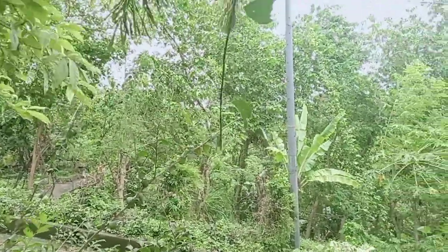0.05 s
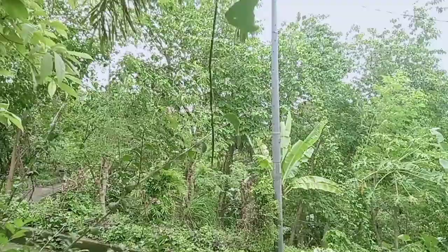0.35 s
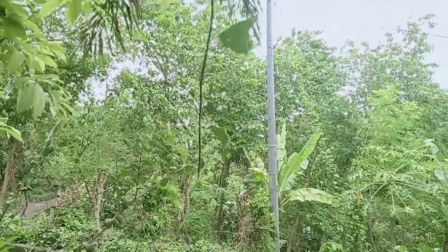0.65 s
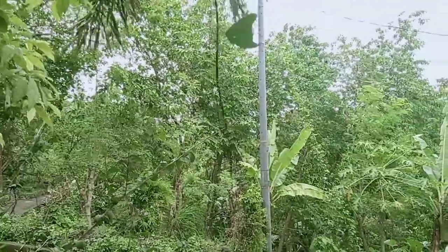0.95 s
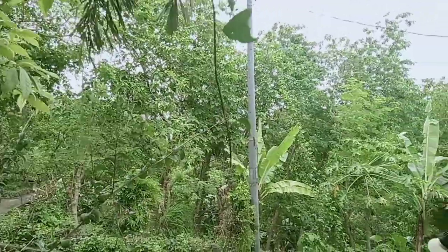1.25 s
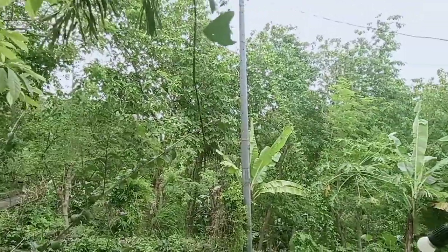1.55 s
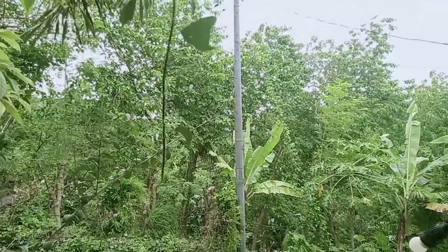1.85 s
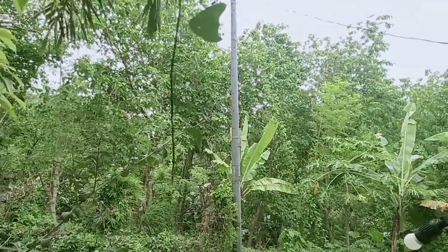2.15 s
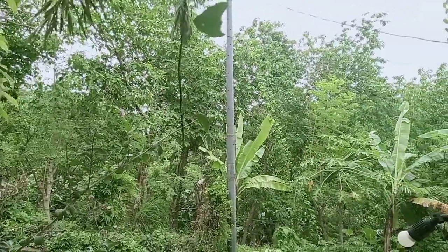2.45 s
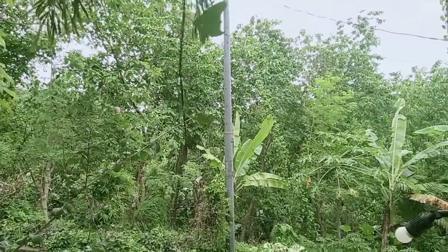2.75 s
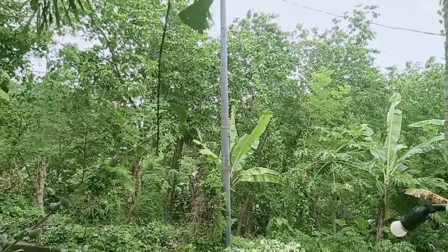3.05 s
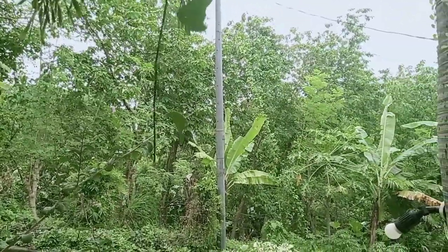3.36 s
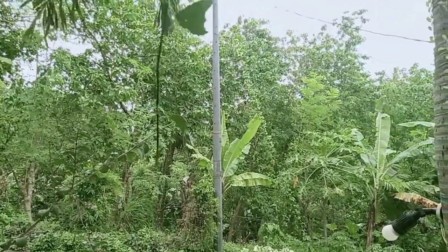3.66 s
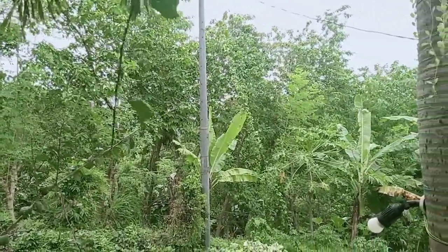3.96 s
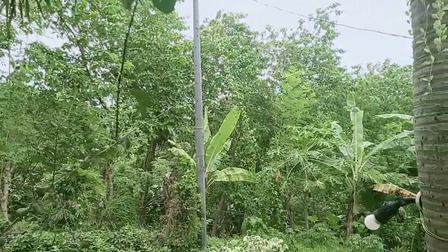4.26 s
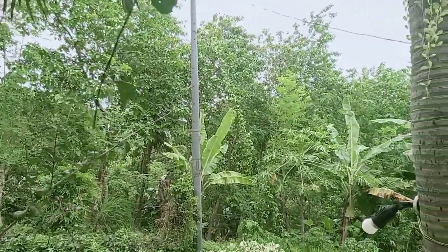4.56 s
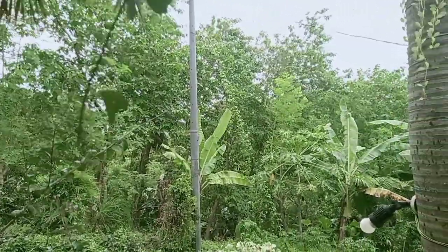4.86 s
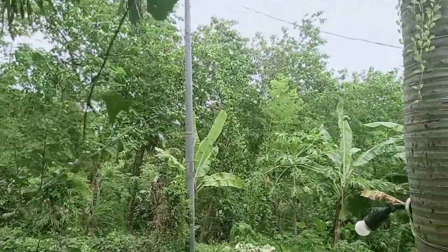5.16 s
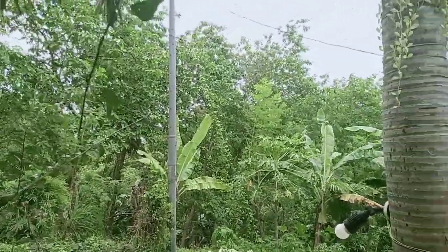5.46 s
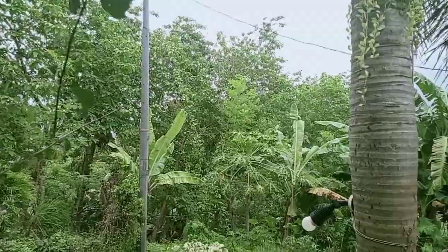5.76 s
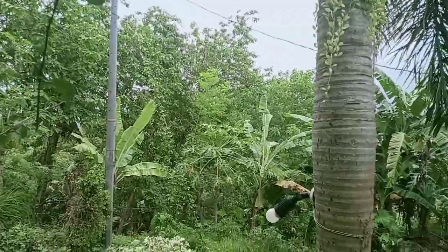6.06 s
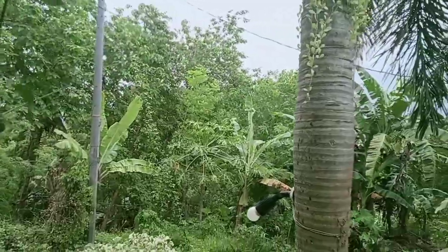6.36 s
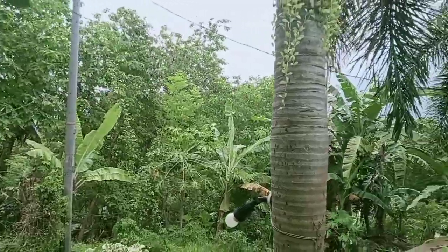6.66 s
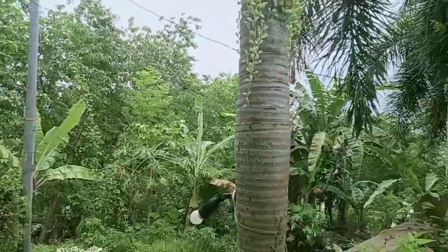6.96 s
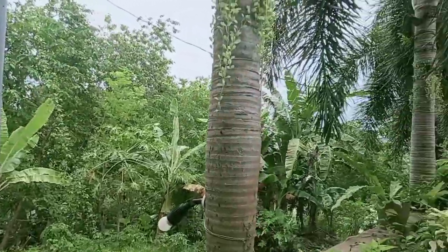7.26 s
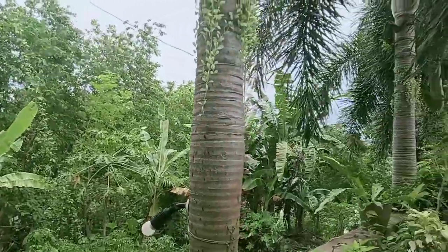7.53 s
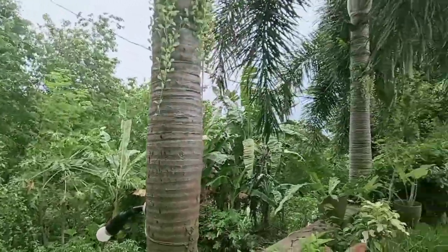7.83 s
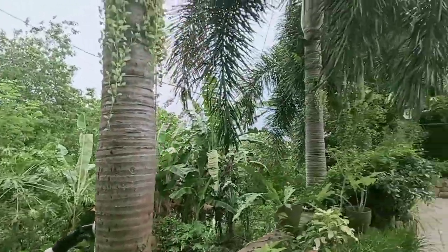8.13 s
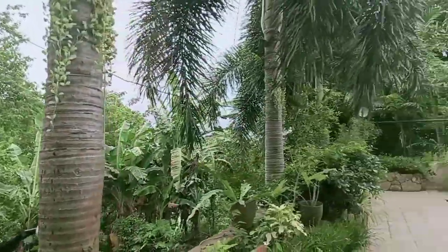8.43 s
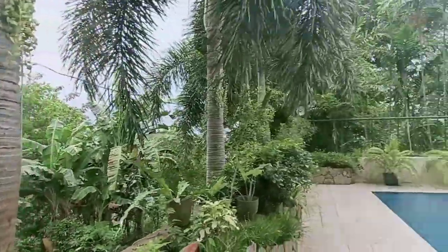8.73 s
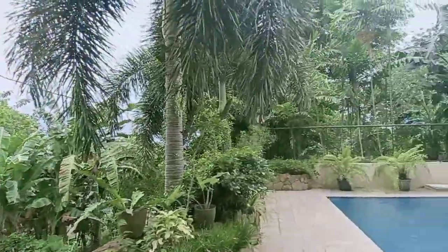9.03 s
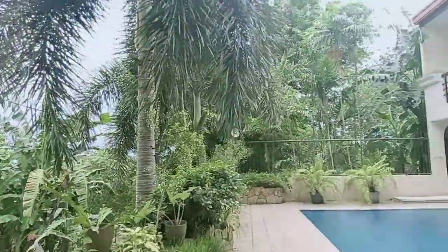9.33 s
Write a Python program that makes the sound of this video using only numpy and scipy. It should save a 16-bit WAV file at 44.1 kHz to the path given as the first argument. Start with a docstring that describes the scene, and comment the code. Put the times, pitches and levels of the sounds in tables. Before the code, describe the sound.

A soft hiss of breeze in garden trees runs throughout, with fine flicks of nearer leaves and a steady low wash of distant traffic. A sharp little twig tick comes right at the start, and a nearby branch rustles in the first second or so, along with a few low puffs of wind on the microphone. A faint, far engine hums from about 0.4 to 3.2 seconds, growing slightly louder before fading. Fainter ticks fall near 2.4, 4.1 and 7 seconds. From 3.5 seconds the wind buffets the microphone in short low bursts, with the hardest thumps around 4.8 to 5 seconds and more gusts from 6.4 to 7.7. The leaves swell around 7.5 to 8.5 seconds while a faint low drone passes on the far road, and everything settles by 9.5 seconds. The sound is mono and dull, with little treble.

```python
"""A breeze stirs the trees of a lush garden and buffets a dull-sounding mono microphone.
Far leaves merge into a hiss and near ones flick together, swelling in a gust towards the end.
Eddies at the microphone's port make short low bursts of pressure over a wash of far traffic.
A distant engine's exhaust sounds a harmonic series for the first seconds, a few twigs tick,
and late on a low drone swells on the far road."""
import sys
import numpy as np
from scipy import signal
from scipy.fft import rfft, irfft, next_fast_len
from scipy.io import wavfile

SR = 44100
rng = np.random.default_rng(int(sys.argv[2]) if len(sys.argv) > 2 else 0)


def inscribe(sig):
    """Save sig as 16-bit PCM at rate SR to the path in sys.argv[1].

    A 1-D sig is mono; a 2-D sig holds one channel per row.
    Samples are clipped to [-1, 1] before scaling.
    """
    pcm = np.round(np.clip(np.atleast_2d(sig).T, -1, 1) * 32767)
    wavfile.write(sys.argv[1], SR, pcm.astype(np.int16))


N = 418509

# leaf hiss as the breeze varies: (time [s], relative level [dB])
BREEZE_LEVEL = [(0.15, -43.5), (0.25, -44), (3.87, -45.5), (5.38, -44), (5.74, -42), (7.61, -39.5),
                (8.42, -40), (9.49, -44.5)]
# spectrum of far leaves: (frequency [Hz], relative density [dB])
LEAF_SPECTRUM = [(200, -16.5), (600, -4), (1300, -4.5), (2050, 5), (2700, 1.5), (3700, -0.5), (8000, -6.5),
                 (16000, -4)]
# shakes of a nearby branch: (time [s], level [dB], duration [s])
BRANCH_SHAKES = [(.06, -44.5, 0.17), (.31, -42.5, .07), (.73, -37, 0.081), (1.06, -45, 0.32), (1.9, -50, 1)]
# spectrum of far roads: (frequency [Hz], relative density [dB])
TRAFFIC_SPECTRUM = [(25, -11), (55, 6.5), (110, 2), (175, 10), (260, 5.5), (420, 3.5), (600, 0), (760, 0),
                    (930, 1), (1200, -3), (1600, -5), (3000, -16), (8000, -14)]
# rumble of steady airflow over the port: (time [s], relative level [dB])
AIRFLOW_LEVEL = [(0, -43), (1.5, -39.5), (2.6, -43), (3.05, -36), (4, -41), (4.9, -36), (6.2, -45.5),
                 (7.2, -36), (8, -43), (8.7, -42), (9.49, -53.5)]
# spectrum of turbulence at the port: (frequency [Hz], relative density [dB])
PORT_SPECTRUM = [(15, -41), (35, -19.5), (55, -2), (95, 5.5), (150, 1), (220, -6), (320, -17.5), (500, -28),
                 (900, -44.5), (2500, -80.5)]
# dry snaps: (time [s], peak level [dB], centre [Hz], bandwidth [Hz], 60 dB decay time [s])
TWIG_SNAPS = [(.0583, -5, 2000, 5000, 0.0022), (2.411, -18, 1650, 1400, .012),
              (4.107, -25, 1910, 300, 0.024), (6.982, -21, 850, 1200, .008)]
# gusts that reach the microphone: (start [s], duration [s], rms level [dB])
PORT_GUSTS = [(0.116, 0.28, -32), (1.45, 0.18, -36), (4.442, 0.15, -27.5), (4.733, 0.16, -26.5),
              (5.054, 0.27, -27.5), (5.529, 0.41, -35), (6.585, 0.46, -30.5), (7.05, .17, -28),
              (7.554, .12, -31)]
# the hardest eddies: (time [s], rms level [dB])
HARD_EDDIES = [(.174, -21.5), (.249, -24.5), (.84, -27.5), (1.194, -27), (3.546, -24.5), (3.678, -17.5),
               (4.351, -21.5), (4.417, -20), (4.474, -20), (4.512, -16.5), (4.564, -18), (4.734, -17.5),
               (4.807, -11.5), (4.852, -17), (4.954, -14), (4.989, -18.5), (5.276, -22), (5.65, -30),
               (5.873, -28), (6.443, -25), (6.506, -26), (6.682, -29.5), (6.788, -19), (6.937, -27.5),
               (7.12, -21), (7.204, -20.5), (7.338, -21.5)]
# engine speed: (time [s], firing rate [Hz])
FIRING_RATE = [(.4, 51.7), (1.2, 51), (1.9, 52), (2.3, 52), (2.75, 53.2), (3.15, 53.3)]
# engine load: (time [s], load [0-1])
ENGINE_LOAD = [(2.25, 0), (2.6, 1), (3.15, 1)]
# exhaust series: (harmonic [number], relative level cruising [dB], relative level under load [dB])
EXHAUST_HARMONICS = [(1, -9, -14.5), (2, 2, -1), (3, 0.5, -3.5), (4, 1, 3), (5, -9, -3), (6, -3.5, -8.5),
                     (7, -18, -8), (8, -18, -14), (9, -16, -12.5)]
# tight vortices that hit the port squarely: (time [s], peak level [dB], frequency scale [Hz])
VORTICES = [(4.8, -10, 292), (4.8189, -6, 283)]
# microphone response: (frequency [Hz], gain [dB])
MIC_RESPONSE = [(20, -16), (36, -6), (55, 0), (3700, 0.5), (4200, -6), (5000, -18), (5500, -24.5),
                (6500, -20.5), (8300, -24), (9200, -32), (10000, -38), (11400, -38.5), (12500, -43),
                (15500, -40)]


def from_db(db):
    """Decibels to amplitude ratio."""
    return 10 ** (np.asarray(db) / 20)


def rms_one(x):
    """Normalisation to rms 1."""
    return x / np.sqrt(np.mean(x ** 2) + 1e-20)


def seconds():
    """The time of every sample."""
    return np.arange(N) / SR


def in_time(curve):
    """Linear interpolation of (time, value) rows at every sample."""
    return np.interp(seconds(), *np.transpose(curve))


def coloured(x, spectrum, stretch=1):
    """Spectral shaping of x, with the spectrum's frequencies multiplied by stretch."""
    hz, db = np.transpose(spectrum)
    size = next_fast_len(len(x), real=True)
    bins = np.maximum(np.fft.rfftfreq(size, 1 / SR), 1)
    gain = from_db(np.interp(np.log(bins), np.log(hz * stretch), db))
    return irfft(rfft(x, size) * gain, size)[:len(x)]


def noise(spectrum):
    """Stationary noise of a given spectrum, rms 1."""
    return rms_one(coloured(rng.standard_normal(N), spectrum))


def drift(rate):
    """Low-pass random fluctuation of spread 1, changing about rate times a second."""
    pole = np.exp(-200 * np.pi * rate / SR)
    white = rng.standard_normal(N // 100 + 1002)  # one value per 100 samples
    slow = signal.lfilter([1], [1, -2 * pole, pole * pole], white)[1000:]
    return np.interp(np.arange(N) / 100, np.arange(len(slow)), rms_one(slow))


def bell(t, length):
    """Gaussian envelope around t = 0, within 3 dB of its top for the given length."""
    return 2 ** (-2 * (t / length) ** 2)


def resonance(x, hz, width):
    """Two-pole resonance with gain 1 at its centre."""
    return signal.lfilter(*signal.iirpeak(hz, hz / width, fs=SR), x + 1e-18)


def add(out, s, sound):
    """Superpose a short sound on out from time s."""
    at = round(s * SR)
    low, high = max(at, 0), min(at + len(sound), N)
    out[low:high] += sound[low - at:high - at]


def tree_tops(gain_db=4.0, flutter_db=0.36):
    """Incoherent summation: countless far leaves merge into a hiss that follows the breeze."""
    return from_db(in_time(BREEZE_LEVEL) + gain_db + flutter_db * drift(9)) * noise(LEAF_SPECTRUM)


def near_leaves(gain_db=-7, base_flicks_per_s=600, size_db=3.0, clump_db=2.5, damping=0.44, count=14):
    """Impact excitation: leaves collide in random clumps, and each rings for a cycle or two."""
    shake_power = sum((from_db(db) * bell(seconds() - s, length)) ** 2
                      for s, db, length in BRANCH_SHAKES)
    stir = np.sqrt(from_db(in_time(BREEZE_LEVEL) + gain_db) ** 2 + shake_power)
    per_s = base_flicks_per_s * (stir / stir.mean()) ** .7  # a stronger stir brings more flicks
    struck = rng.random(N) < per_s * from_db(clump_db * drift(7)) / SR
    strength = from_db(size_db * np.minimum(rng.exponential(1, N), 4))
    flicks = struck * strength * rng.choice([-1, 1], N)
    leaf = rng.integers(0, count, N)
    leaf_hz = np.geomspace(1100, 11000, count)
    rustle = sum(resonance(flicks * (leaf == k), hz, damping * hz) for k, hz in enumerate(leaf_hz))
    return stir * rms_one(rustle / np.sqrt(per_s))


def traffic(level_db=-36, waver_db=-0.07):
    """Incoherent summation: far vehicles blend into a steady rumble with a hump of tyre noise."""
    return from_db(level_db + waver_db * drift(2.0)) * noise(TRAFFIC_SPECTRUM)


def port_rumble(gain_db=-1.0, lumpy_db=2.5):
    """Turbulent pressure fluctuation: weak airflow keeps up a lumpy rumble in the port."""
    return from_db(in_time(AIRFLOW_LEVEL) + gain_db + lumpy_db * drift(12.0)) * noise(PORT_SPECTRUM)


def twig_ticks(splinter_db=-17, size=2048):
    """Brittle fracture: one crack and its fast-dying splinters excite a damped resonance."""
    out, t = np.zeros(N), np.arange(size) / SR
    for s, db, hz, width, t60 in TWIG_SNAPS:
        splinters = from_db(splinter_db - 60 * t / t60) * rng.standard_normal(size)
        snap = resonance((t == 0) + splinters, hz, width)
        add(out, s, from_db(db) * snap / np.abs(snap).max())
    return out


def gusts(eddies_per_s=16, uneven=0.31, flutter_db=6, edge_s=0.024, calm_db=-33, octaves_per_db=0.09):
    """Eddy shedding at an uneven pace modulates each gust's rumble; stronger gusts sound higher."""
    out, t = 0, seconds()
    shedding_phase = 2 * np.pi * np.cumsum(eddies_per_s * (1 + uneven * drift(8.03))) / SR
    flutter = from_db(flutter_db * np.sin(shedding_phase))
    turbulence = rng.standard_normal(N)
    for s, length, db in PORT_GUSTS:
        envelope = np.clip(np.minimum(t - s, s + length - t) / edge_s + .5, 0, 1)
        rumble = coloured(turbulence, PORT_SPECTRUM, 2 ** (octaves_per_db * (db - calm_db)))
        out = out + from_db(db) * envelope * rms_one(flutter * rumble)
    return out


def buffets(length_s=0.02, calm_db=-23, octaves_per_db=0.05, size=8192):
    """Frequency scales with flow speed: a hard eddy shakes the port briefly, higher when stronger."""
    out, t = np.zeros(N), (np.arange(size) - size / 2) / SR
    swell = bell(t, length_s)
    for s, db in HARD_EDDIES:
        stretch = 2 ** (octaves_per_db * (db - calm_db))
        eddy = swell * coloured(rng.standard_normal(size), PORT_SPECTRUM, stretch)
        add(out, s + t[0], from_db(db) * rms_one(eddy) * np.sqrt(np.mean(swell ** 2)))
    return out


def engine(gain_db=-46.5, load_gain_db=5.5, jitter=0.0017, fading_db=2.1, edge_s=0.24):
    """Periodic firing gives exhaust harmonics, louder under load; moving air fades each on its own."""
    load = in_time(ENGINE_LOAD)
    firing_hz = in_time(FIRING_RATE) * (1 + jitter * drift(7.0))
    phase = 2 * np.pi * np.cumsum(firing_hz) / SR
    exhaust = 0
    for harmonic, cruise_db, load_db in EXHAUST_HARMONICS:
        gain = from_db(cruise_db + load * (load_db - cruise_db) + fading_db * drift(3.9))
        exhaust = exhaust + gain * np.sin(harmonic * phase + rng.uniform(0, 2 * np.pi))
    outside_s = np.maximum(FIRING_RATE[0][0] - seconds(), seconds() - FIRING_RATE[-1][0])
    envelope = np.clip(1 - outside_s / edge_s, 0, 1)
    return np.sqrt(2) * from_db(gain_db + load_gain_db * load) * envelope * exhaust


def vortex_thumps(size=2048):
    """A bipolar pressure pulse: a vortex crossing the port pushes, then sucks."""
    out, t = np.zeros(N), (np.arange(size) - size / 2) / SR
    for s, db, hz in VORTICES:
        passage = 2 * np.pi * hz * t
        pressure = -np.tanh(passage) / np.cosh(passage)
        add(out, s + t[0], from_db(db) * pressure / pressure.max())
    return out


def road_drone(peak_s=8.24, length_s=0.75, level_db=-40, hz=171, width_hz=45):
    """Narrow-band noise has a pitch: a low drone swells and passes on the far road."""
    drone = rms_one(resonance(noise(TRAFFIC_SPECTRUM), hz, width_hz))
    return from_db(level_db) * bell(seconds() - peak_s, length_s) * drone


def scene():
    """Superposition of the garden, the wind on the microphone and the far roads."""
    garden = tree_tops() + near_leaves() + twig_ticks()
    wind = port_rumble() + gusts() + buffets() + vortex_thumps()
    roads = traffic() + road_drone() + engine()
    return (garden + wind + roads)[None]


def record(dry, cutoff_hz=15500):
    """Band limiting: the microphone loses the deepest bass and much treble; a low-pass cuts the top."""
    dull = coloured(dry[0], MIC_RESPONSE)
    low_pass = signal.ellip(10, .1, 80, cutoff_hz, fs=SR, output="sos")
    return signal.sosfilt(low_pass, dull)[None]


dry = scene()
out = record(dry)
inscribe(out)
```